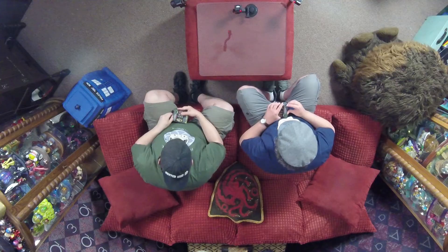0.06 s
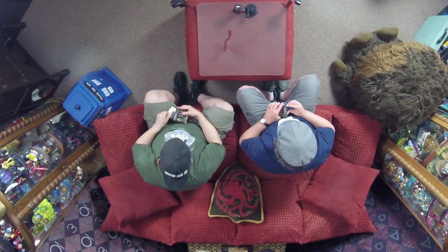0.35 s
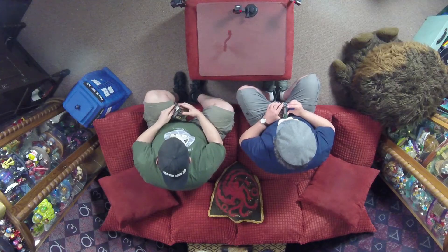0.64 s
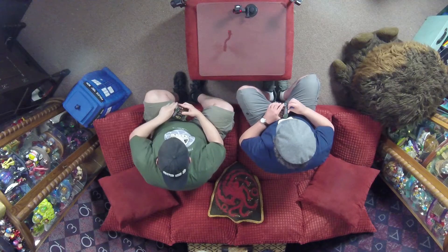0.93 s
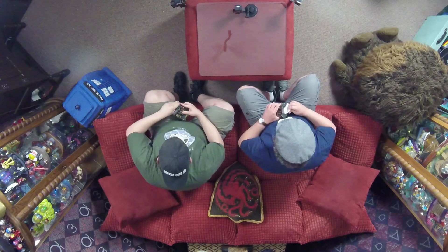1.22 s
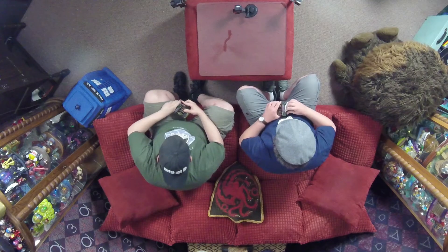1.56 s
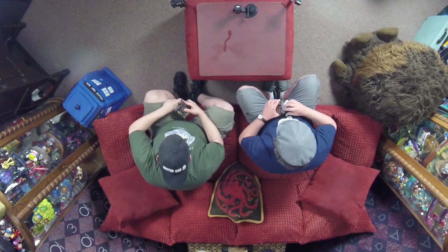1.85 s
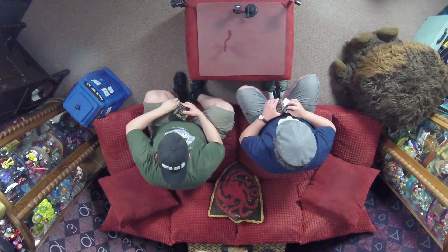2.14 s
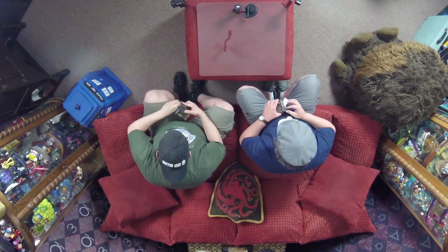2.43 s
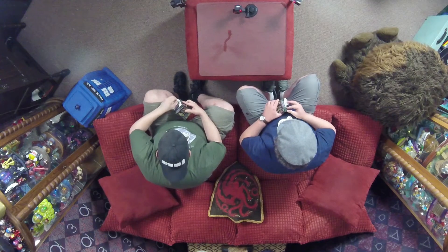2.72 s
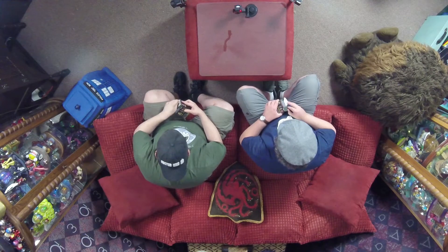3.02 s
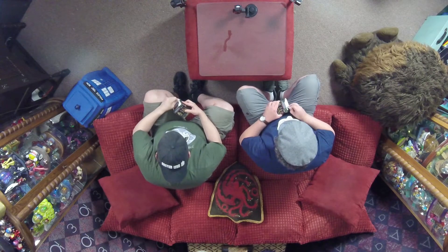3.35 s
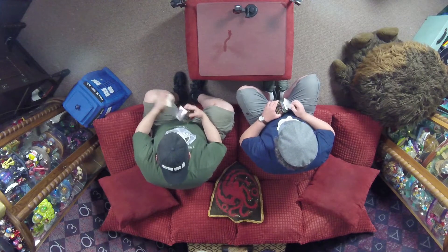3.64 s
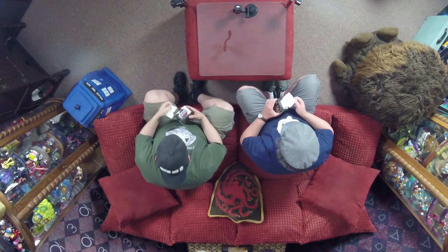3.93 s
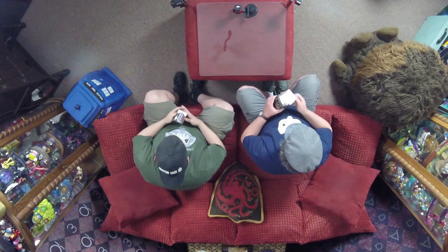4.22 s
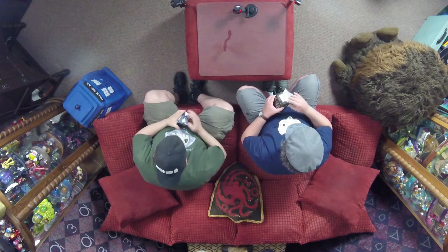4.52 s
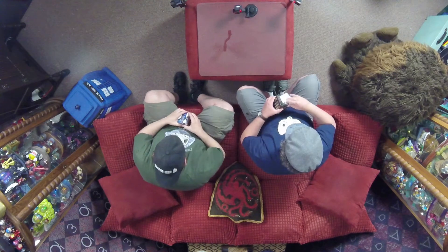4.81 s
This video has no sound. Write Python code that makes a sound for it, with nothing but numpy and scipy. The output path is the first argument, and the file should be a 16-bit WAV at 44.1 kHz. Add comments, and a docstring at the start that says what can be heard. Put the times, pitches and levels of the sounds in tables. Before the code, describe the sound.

Fingers rub and pick at small cardboard boxes indoors, flaps snapping loose amid brief tears and hollow taps.

```python
"""Opening cardboard boxes on a sofa

A quiet room, one microphone, two people tearing open small boxes. Fingers slide over card and
wrapping, the card rips fibre by fibre, glued flaps snap loose, fingertips knock on the hollow
boxes and nails scrape along the edges. A low table close by throws back a strong early echo,
and the room rings briefly over a faint hush."""
import sys
import numpy as np
from scipy import signal
from scipy.fft import rfft, irfft, next_fast_len
from scipy.io import wavfile
from scipy.ndimage import map_coordinates

SR = 44100
rng = np.random.default_rng(int(sys.argv[2]) if len(sys.argv) > 2 else 0)


def unload_audio(sound):
    """Save the sound as a 16-bit wav file, at the path given as the first command line argument."""
    columns = np.transpose(np.atleast_2d(sound))
    # keep every value between -1 and 1, then stretch to whole-number steps
    steps = np.round(np.clip(columns, -1, 1) * 32767)
    wavfile.write(sys.argv[1], SR, steps.astype(np.int16))


N = 223624

# fingers sliding over a box: start_s, length_s, wrapping_db, card_db, hollow_db
FINGER_STROKES = [(0.0, 0.032, -53, -61.5, -58), (0.718, 0.055, -60.5, -73, -50),
                  (0.957, 0.18, -62.5, -69, -66.5), (1.148, 0.095, -52, -69, -49.5),
                  (1.305, 0.11, -58, -42.5, -42), (1.414, 0.25, -61.5, -53, -69),
                  (1.469, 0.073, -52, -50, -78), (1.703, 0.16, -55.5, -55, -70),
                  (1.845, 0.086, -52, -54.5, -77), (1.936, 0.083, -55.5, -52, -79),
                  (2.018, 0.11, -69, -84, -89), (2.123, 0.11, -58, -81, -96), (2.201, 0.1, -61, -61, -73.5),
                  (2.502, 0.2, -56, -55.5, -85.5), (2.759, 0.16, -60.5, -76.5, -91),
                  (2.874, 0.11, -57.5, -66, -70), (2.989, 0.11, -55.5, -63, -73),
                  (3.109, 0.15, -57.5, -51.5, -57), (3.241, 0.133, -52.5, -64, -68),
                  (3.441, 0.2, -51.5, -51, -53.5), (3.769, 0.12, -47.5, -50.5, -48.5),
                  (3.89, 0.077, -43, -47, -50), (3.955, 0.049, -60.5, -53.5, -45),
                  (4.051, 0.16, -54.5, -50.5, -54.5), (4.364, 0.062, -61, -70, -71.5),
                  (4.408, 0.077, -53, -70, -81), (4.514, 0.067, -53.5, -66, -85),
                  (4.602, 0.098, -58, -55.5, -53.5), (4.686, 0.057, -59, -71, -66),
                  (4.938, 0.088, -54.5, -54, -56), (4.967, 0.038, -64.5, -43.5, -48.5),
                  (5.029, 0.072, -50.5, -49, -54.5)]
# hands shifting as they hold a box: start_s, length_s
FIDGET_SPANS = [(0.0, 0.14), (0.418, 1.94), (2.5, 3.4)]
# card tearing: start_s, length_s, level_db, pull_change_db, tilt_db_per_octave, lowest_panel_hz
CARD_RIPS = [(0.257, 0.013, -54, 24, 4.5, 400), (0.266, 0.11, -27, -1.5, 2, 340),
             (0.757, 0.016, -34.5, 0, -3, 524), (1.198, 0.024, -15, -14, 2, 603),
             (2.554, 0.091, -45, 10, -1.5, 458), (3.36, 0.048, -31.5, -4, 0.5, 483),
             (3.577, 0.022, -22.5, -21, -12.5, 380), (3.608, 0.085, -15, -7, 0.85, 249),
             (3.686, 0.061, -34, -2, -2, 290), (4.131, 0.062, -29.5, -22.5, -5, 409)]
# sharp snaps of card, from glued flaps letting go and from louder breaks within a tear: start_s, level_db,
# low_body_db, treble_db, panel_hz, flap_hz, ring_db
CARD_SNAPS = [(0.269, -5.5, -3.5, 4, 617, 3640, 12), (0.334, 1, 3, 6, 620, 4920, 15),
              (0.7576, 1, -13.5, -1, 665, 3590, 14.5), (0.8861, -2, -21, 0, 990, 4030, 11),
              (1.066, -1, 4.5, -2.5, 880, 1900, 11), (1.2014, 8, -12, -12, 1190, 2450, 1),
              (1.238, 8, -1.5, -7.5, 1180, 2750, 7), (1.354, -11.5, -16, -7.5, 510, 3120, 6),
              (1.668, -13.5, -7.5, -7.5, 1223, 2880, -4), (1.9974, -21, -27, 7, 1130, 3140, 9),
              (2.482, -19.5, -30, 3, 1140, 4720, 12.5), (2.6234, 5, -24.5, -3.5, 1166, 2900, 7),
              (3.083, -10, -32, -5.5, 1180, 3500, 0), (3.3451, 6.5, -5.5, 1.5, 860, 3560, 14),
              (3.372, -7.5, -14.5, 8.5, 910, 3620, -5), (3.409, -10.5, -18, 13.5, 900, 3650, 0.5),
              (3.5207, -11.5, -6.5, 7.5, 920, 3750, 0), (3.573, 5, -13, -8.5, 1210, 2740, 6.5),
              (3.603, 9, -13, -6, 917, 3076, 14), (3.612, 10.5, -17.5, -3.5, 1150, 2900, 3),
              (3.7231, -3.5, 0, -3, 813, 2770, -2), (3.889, -11.5, 4.5, 8.5, 540, 3010, -2),
              (4.130, -5, 4, -15.5, 578.6, 2430, 8.5), (4.7897, -27, -5, 16, 592, 4940, 9),
              (4.9152, -13, -2, 8, 543, 7100, 8.5)]
# fingers bumping and flexing a box: start_s, energy_db, pitch_hz, relative_scuff_db, contact_t60_s
FINGER_KNOCKS = [(0.292, -5.5, 339, -14, 0.15), (0.33, -7.5, 441, -19.5, 0.12),
                 (0.499, -10.5, 470, 4, 0.089), (0.521, -13, 529, 9.5, 0.045),
                 (0.705, -20.5, 527, -21, 0.27), (0.749, -9, 618, -10, 0.095), (1.065, -4, 485, 2, 0.033),
                 (1.191, -11.5, 500, -1.5, 0.04), (1.379, -7, 440, -16, 0.14), (1.533, -16, 508, -4, 0.092),
                 (1.594, -16.5, 547, 7, 0.12), (1.647, -15, 176.4, -4, 0.029), (2.312, -21.5, 714, 0, 0.03),
                 (2.317, -19.5, 463, -21, 0.027), (2.619, -10.5, 438, -10, 0.04),
                 (3.087, -26, 557, -12, 0.074), (3.194, -10, 374, -17, 0.033),
                 (3.643, 1.5, 302, -18.5, 0.11), (3.658, 3.5, 448, -12.5, 0.07),
                 (3.668, -2, 177, -19, 0.028), (3.675, 6, 774, 7.5, 0.062), (4.18, -21.5, 270, -13, 0.043),
                 (4.614, -14, 522, 0, 0.078), (4.633, -6, 418, -9.5, 0.046), (4.83, -15, 610, -18.5, 0.037),
                 (4.933, -19.5, 434, -7, 0.052)]
# short skids along a card edge: start_s, level_db, pitch_hz, length_s, sharpness_q
EDGE_SCRAPES = [(1.662, -37, 1450, 0.055, 1.0), (1.856, -48, 1500, 0.05, 2.5),
                (1.929, -42, 2150, 0.04, 1.2), (2.04, -57.5, 2650, 0.1, 6), (2.135, -53.5, 2750, 0.07, 4.5),
                (2.196, -50.5, 2850, 0.05, 4), (2.306, -51, 1020, 0.015, 4.6), (2.48, -42, 3580, 0.007, 16),
                (2.482, -43, 1205, 0.008, 15), (2.554, -45.5, 630, 0.03, 1.2),
                (2.885, -56.5, 3100, 0.07, 2.5), (3.031, -43.5, 2150, 0.035, 0.9),
                (3.081, -39.5, 1800, 0.047, 0.8), (3.259, -46.5, 3800, 0.045, 3.3),
                (4.042, -46.5, 2500, 0.028, 4), (4.404, -49, 1525, 0.01, 10),
                (4.495, -50.5, 785, 0.042, 17)]

# tone of the hollow box under a sliding finger: frequency_hz, level_db
HOLLOW_SPECTRUM = [(100, -29), (250, -31), (420, 2), (580, 7), (850, 4), (1400, -4.5), (4000, -45)]
# tone of the rubbed card face: frequency_hz, level_db
FACE_SPECTRUM = [(400, -54), (900, -8), (1250, 0), (2000, 4.5), (2650, 0.5), (3600, -3.5), (6000, -12.5),
                 (14000, -34)]
# tone of the rubbed wrapping: frequency_hz, level_db
WRAPPING_SPECTRUM = [(1500, -38.5), (3500, -3), (4800, -4), (6500, -5), (9000, -6.5), (12000, -11),
                     (16000, -25)]
# tone of tearing fibres: frequency_hz, level_db
FIBRE_SPECTRUM = [(60, -32.5), (120, -3), (200, -32), (450, 1.5), (800, 4), (1300, 0.5), (2000, -2),
                  (3200, -6.5), (6000, -11), (9000, -12.5), (12000, -17.5), (16000, -33)]
# tone of snapping card: frequency_hz, level_db
SNAP_SPECTRUM = [(60, -28.5), (170, -27), (280, -12.5), (450, 7), (750, -2), (1200, -1.5), (2000, -3.5),
                 (3500, -7), (5500, -3), (8500, -1.5), (12000, -10), (16000, -21)]
# tone of a fingertip scuffing as it knocks: frequency_hz, level_db
SCUFF_SPECTRUM = [(400, -38.5), (850, 4), (1200, -1.5), (2400, -8), (3800, -11.5), (6000, -16),
                  (14000, -31)]
# room tone: frequency_hz, level_db
HUSH_SPECTRUM = [(20, -2.5), (60, -13), (200, -9.5), (550, -9.5), (1500, -14.5), (5000, -14.5),
                 (16000, -18)]
# table, floor and walls at the microphone, relative to the direct sound: delay_s, gain
EARLY_ECHOES = [(0.0038, 1.0), (0.0085, 0.2), (0.0125, 0.28), (0.0175, 0.2), (0.0272, 0.2)]
# ring of the room: frequency_hz, t60_s
ROOM_DECAY = [(150, 0.21), (500, 0.24), (1500, 0.28), (4000, 0.2624), (9000, 0.22), (15000, 0.18)]

STROKE_ATTACK_S, STROKE_RELEASE_S = 0.013, 0.024
FIDGET_SWING_DB, FIDGET_CHANGES_PER_S = 4, 7
RIP_ATTACK_S, RIP_TILT_PER_DB = 0.0044, 0.43  # dB/octave of tilt gained per dB of pull
BAND_LIMIT_HZ = 16000


def amp(db):
    """Decibels to gain."""
    return 10 ** (np.asarray(db) / 20)


def unit_energy(x):
    """Scale to energy 1."""
    return x / (np.linalg.norm(x) + 1e-12)


def along(points, hz):
    """Read (frequency_hz, value) points on a log axis."""
    frequencies, values = np.transpose(points)
    return np.interp(np.log(hz + 1), np.log(frequencies + 1), values)


def add(track, start_s, sound):
    """Mix a sound into the track."""
    part = track[max(round(start_s * SR), 0):][:len(sound)]
    part += sound[:len(part)]


def colour(x, shape_db, size=4096):
    """Pass through a causal filter of energy 1, shaped by shape_db(hz)."""
    gains = amp(shape_db(np.fft.rfftfreq(size, 1 / SR)))
    cepstrum = irfft(np.log(gains + 1e-6))
    cepstrum[1:size // 2] *= 2
    cepstrum[size // 2 + 1:] = 0
    response = irfft(np.exp(rfft(cepstrum)))
    return signal.fftconvolve(x, unit_energy(response))


def wander(count, per_s):
    """A smooth curve through per_s random values a second."""
    position = np.arange(count) / SR * per_s
    return map_coordinates(rng.standard_normal(int(position[-1]) + 4), [position], mode="nearest")


def crackle(count, per_s, spread_db, clump_db=2.5):
    """Tiny slips or fractures at random moments, uneven in size and swelling in clumps; rms 1."""
    happens = rng.random(count) < per_s / SR
    signs = rng.choice([-1, 1], count)
    sizes = amp(spread_db * np.minimum(rng.exponential(size=count), 3.6))
    clicks = happens * signs * sizes * amp(clump_db * wander(count, per_s=1 / 0.0085))
    return clicks / np.sqrt(np.mean(clicks ** 2) + 1e-20)


def hump(hz, centre_hz, octaves):
    """A broad, well damped resonance of card: 1 at its centre, 0 far away."""
    return 1 / (1 + (np.log2((hz + 1) / centre_hz) / octaves) ** 2)


def mode_db(hz, centre_hz, q):
    """One mode of a small panel, which hardly radiates below its pitch."""
    ratio = (hz + 1) / centre_hz
    return -10 * np.log10((1 + (q * (ratio - 1 / ratio)) ** 2) * (1 + (0.5 / ratio) ** 8))


def room(x, wet_db):
    """Hands to microphone: direct sound, early echoes and a diffuse tail, new for each hand position."""
    hz, t, noise = signal.stft(rng.standard_normal(SR // 2), SR, nperseg=256)
    decay = amp(-60 * t / along(ROOM_DECAY, hz)[:, None])
    tail = signal.istft(noise * decay, SR, nperseg=256)[1]
    response = np.zeros(SR // 2)
    response[0] = 1
    for delay_s, gain in EARLY_ECHOES:
        scatter = unit_energy(rng.standard_normal(64) * np.exp(-np.arange(64) / SR / 0.00017))
        add(response, delay_s * rng.uniform(.92, 1.08), gain * scatter)
    add(response, 0.005, amp(wet_db) * unit_energy(tail))
    return signal.fftconvolve(x, unit_energy(response))


def room_tone():
    """The faint, steady hush of the room."""
    return amp(-74.0) * colour(rng.standard_normal(N), lambda hz: along(HUSH_SPECTRUM, hz))[:N]


def stroke_speed(length_s):
    """A sliding finger gets up to speed, holds it and comes to rest."""
    t = np.arange(max(round(length_s * SR), 64)) / SR
    return np.clip(np.minimum(t / STROKE_ATTACK_S, (t[-1] - t) / STROKE_RELEASE_S), 0, 1)


def slide(drive, wrapping_db, card_db, hollow_db):
    """Sliding is a stream of tiny slips that sound the box, the card face and the wrapping."""
    layers = [(HOLLOW_SPECTRUM, hollow_db, crackle(len(drive), per_s=2000, spread_db=6.5)),
              (FACE_SPECTRUM, card_db, crackle(len(drive), per_s=1700, spread_db=2.0)),
              (WRAPPING_SPECTRUM, wrapping_db, crackle(len(drive), per_s=7400, spread_db=5.0))]
    sound = sum(colour(amp(level_db) * drive * slips, lambda hz: along(spectrum, hz))
                for spectrum, level_db, slips in layers)
    return room(sound, wet_db=0.5)


def rubbing():
    """Distinct strokes of the fingers over a faint fidgeting whose pressure wanders."""
    out = np.zeros(N)
    for start_s, length_s, wrapping_db, card_db, hollow_db in FINGER_STROKES:
        add(out, start_s, slide(stroke_speed(length_s), wrapping_db, card_db, hollow_db))
    for start_s, length_s in FIDGET_SPANS:
        speed = stroke_speed(length_s)
        pressure = amp(FIDGET_SWING_DB * wander(len(speed), FIDGET_CHANGES_PER_S))
        add(out, start_s, slide(speed * pressure, wrapping_db=-71, card_db=-79, hollow_db=-81))
    return out


def rips():
    """A tear runs through the card as dense fibre breaks; it grows duller when the pull slackens."""
    out = np.zeros(N)
    for start_s, length_s, level_db, pull_change_db, tilt, panel_hz in CARD_RIPS:
        progress = np.linspace(0, 1, max(round(length_s * SR), 64))
        attack = np.minimum(progress * length_s / RIP_ATTACK_S, 1)
        pull = amp(level_db + pull_change_db * progress) * attack
        breaks = pull * crackle(len(progress), per_s=2600, spread_db=4.0, clump_db=1.5)
        # a small panel radiates little below its lowest mode
        body_db = lambda hz: along(FIBRE_SPECTRUM, hz) - 10 * np.log10(1 + (panel_hz / (hz + 20)) ** 6)
        octaves = lambda hz: np.log2(np.maximum(hz, 400) / 2000)
        end_tilt = tilt + RIP_TILT_PER_DB * pull_change_db
        early = colour(breaks * (1 - progress), lambda hz: body_db(hz) + tilt * octaves(hz))
        late = colour(breaks * progress, lambda hz: body_db(hz) + end_tilt * octaves(hz))
        add(out, start_s, room(early + late, wet_db=0.0))
    return out


def fracture(size=2048):
    """One break in card: bending waves spread it over a millisecond, treble first, and fibres follow."""
    hz, t = np.fft.rfftfreq(size, 1 / SR), np.arange(size) / SR
    delay_s = rng.uniform(0.000895, 0.001436) * (1 - np.sqrt(hz / hz[-1]))
    front = irfft(np.exp(-2j * np.pi * np.cumsum(delay_s) * hz[1]))
    fibres = unit_energy(rng.standard_normal(size) * amp(-60 * t / 0.024))
    return unit_energy(front + 0.5 * fibres)


def snaps():
    """A glued flap lets go, or a tear breaks sharply: one fracture, coloured by panel and flap."""
    out = np.zeros(N)
    for start_s, level_db, low_db, treble_db, panel_hz, flap_hz, ring_db in CARD_SNAPS:
        balance = [(600, low_db), (1200, 0.0057), (3800, 0), (7000, treble_db)]
        body_db = lambda hz: along(SNAP_SPECTRUM, hz) + along(balance, hz)
        modes = lambda hz: hump(hz, panel_hz, octaves=0.16) + hump(hz, flap_hz, octaves=0.23)
        snap = colour(fracture(), lambda hz: body_db(hz) + ring_db * modes(hz))
        add(out, start_s, amp(level_db) * room(snap, wet_db=2.5))
    return out


def knocks():
    """A soft fingertip pushes a box and drags a little: its hollow mode pops and the surface scuffs."""
    out, t = np.zeros(N), np.arange(SR // 6) / SR
    push = np.zeros(len(t))
    add(push, 0.004, np.ones(1))
    for start_s, energy_db, pitch_hz, scuff_db, contact_t60_s in FINGER_KNOCKS:
        contact = amp(-60 * t / contact_t60_s) * (1 - np.exp(-t / 0.003))
        drag = unit_energy(contact * rng.standard_normal(len(t)))
        softness = [(pitch_hz * 0.45, -16), (pitch_hz * 0.85, 0),
                    (pitch_hz * 1.6, 0), (pitch_hz * 12, -35)]
        pop = colour(push + 1.54 * drag, lambda hz: mode_db(hz, pitch_hz, q=6.8) + along(softness, hz))
        scuff = colour(contact * rng.standard_normal(len(t)), lambda hz: along(SCUFF_SPECTRUM, hz))
        knock = unit_energy(pop) + amp(scuff_db - 7.5) * unit_energy(scuff)
        add(out, start_s, amp(energy_db) * unit_energy(room(knock, wet_db=-2.5)))
    return out


def scrapes():
    """A nail or card edge catches and skids to rest, sounding one resonance."""
    out = np.zeros(N)
    for start_s, level_db, pitch_hz, length_s, q in EDGE_SCRAPES:
        speed = np.linspace(1, 0.3, max(round(length_s * SR), 64))
        slips = speed * crackle(len(speed), per_s=2500, spread_db=0.5)
        rolloff = [(pitch_hz * 1.5, 0), (pitch_hz * 8, -12)]
        skid = colour(slips, lambda hz: mode_db(hz, pitch_hz, q) + along(rolloff, hz))
        add(out, start_s, amp(level_db) * room(skid, wet_db=-10.0))
    return out


def scene():
    """Room tone and all the handling, as they reach the one microphone."""
    return (room_tone() + rubbing() + rips() + snaps() + knocks() + scrapes())[None]


def record(dry):
    """The recorder cuts off steeply above its band limit."""
    size = next_fast_len(N + SR // 2)
    hz = np.fft.rfftfreq(size, 1 / SR)
    lowpass = 1 / np.sqrt(1 + (hz / BAND_LIMIT_HZ) ** 160)
    return irfft(rfft(dry, size) * lowpass, size)[:, :N]


dry = scene()
out = record(dry)
unload_audio(out)
```